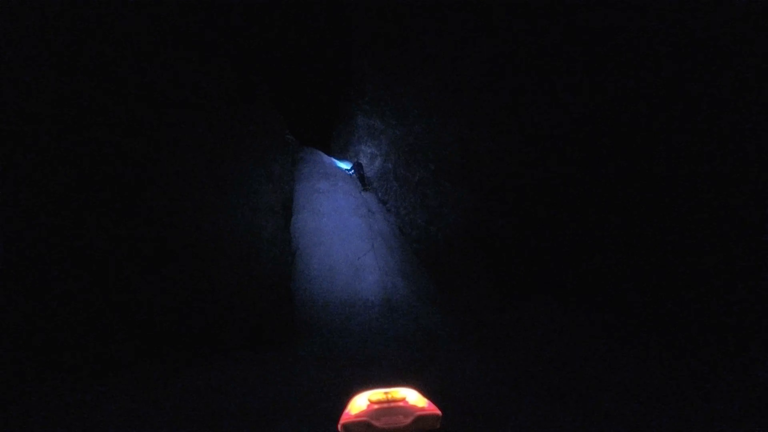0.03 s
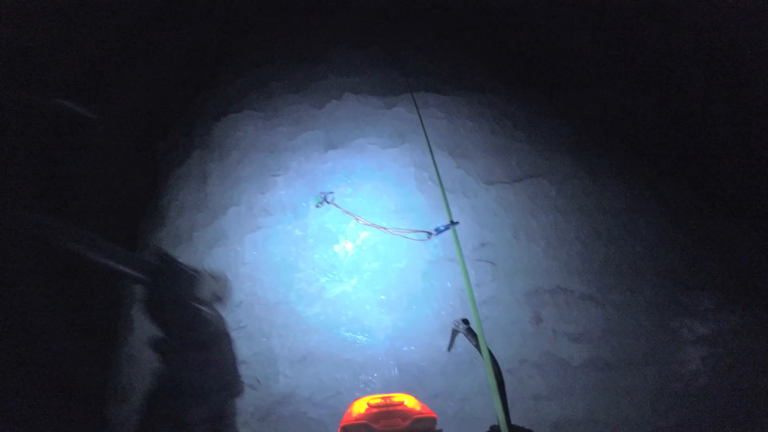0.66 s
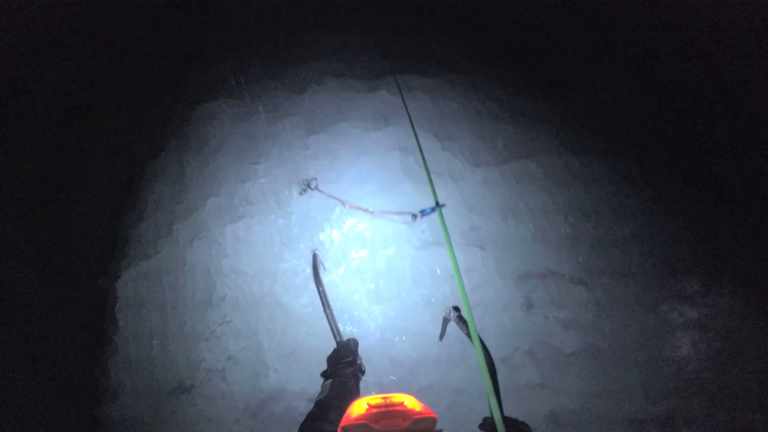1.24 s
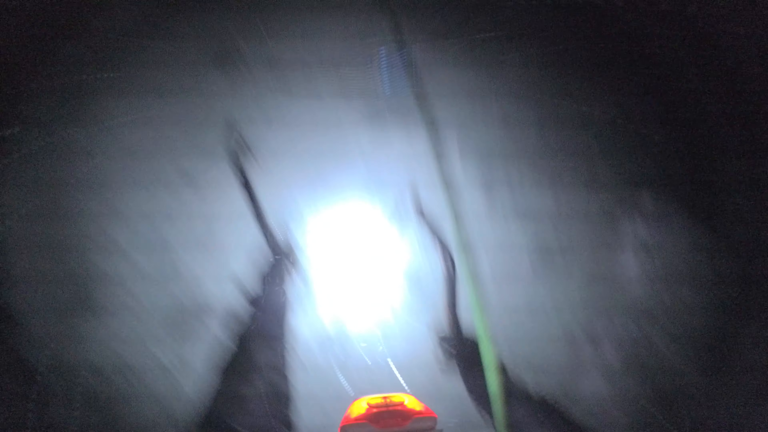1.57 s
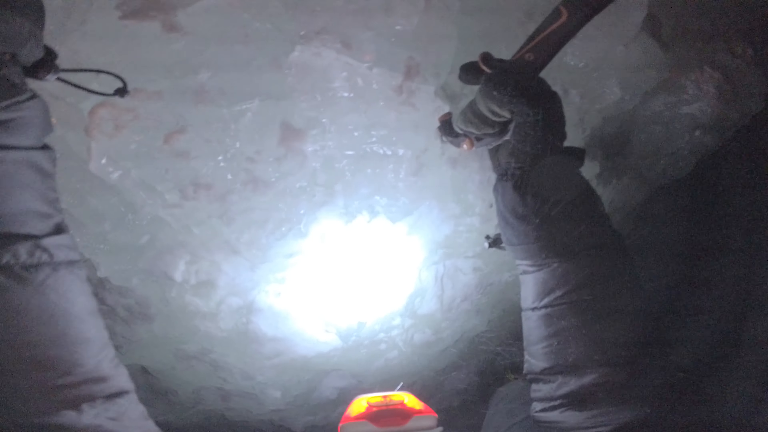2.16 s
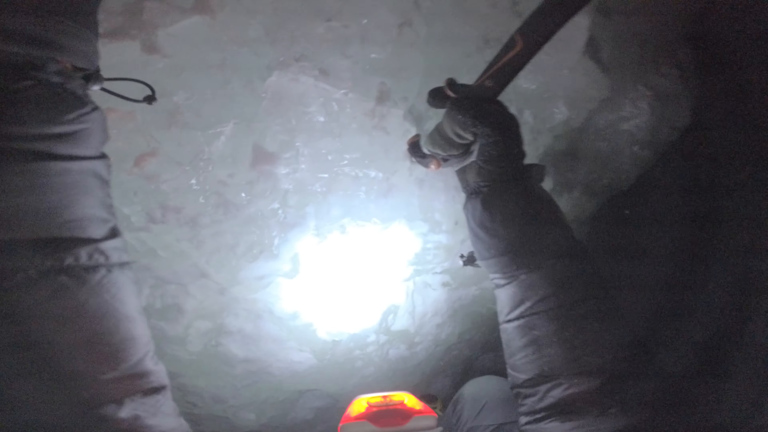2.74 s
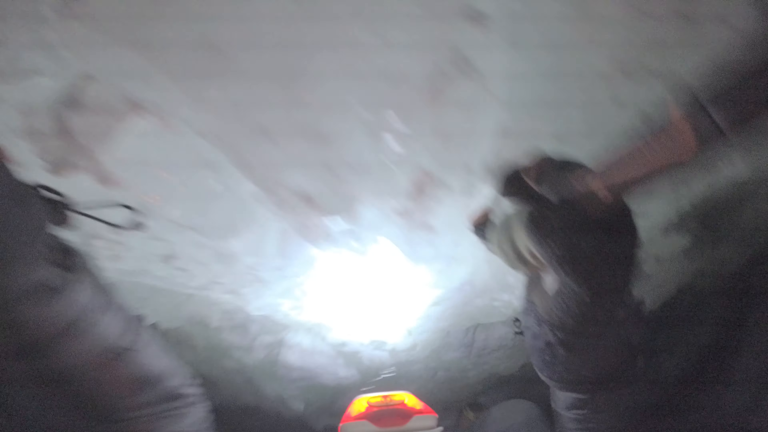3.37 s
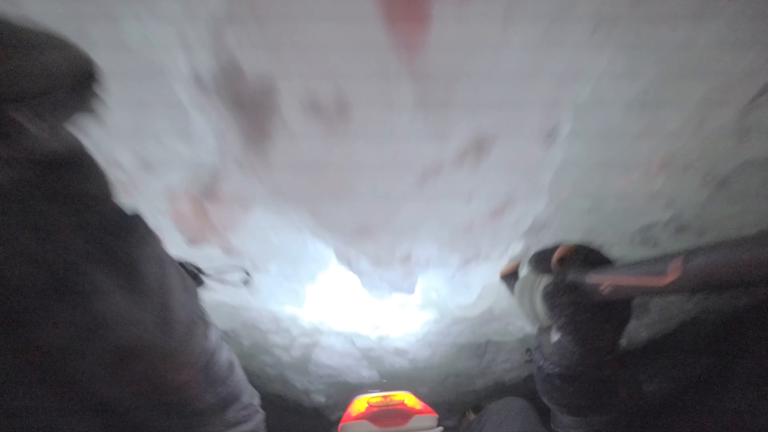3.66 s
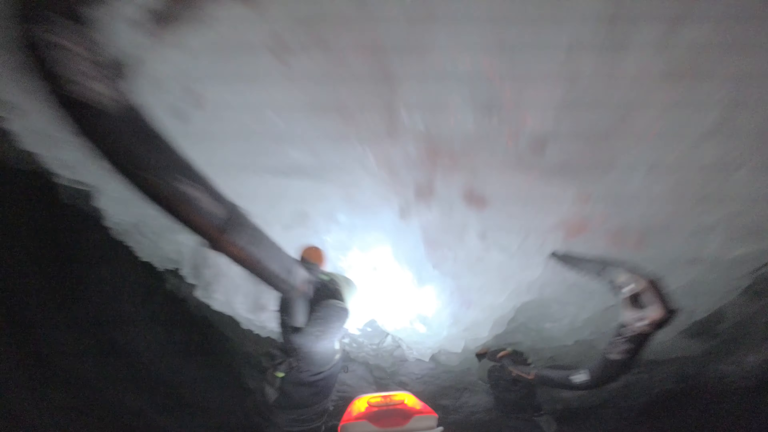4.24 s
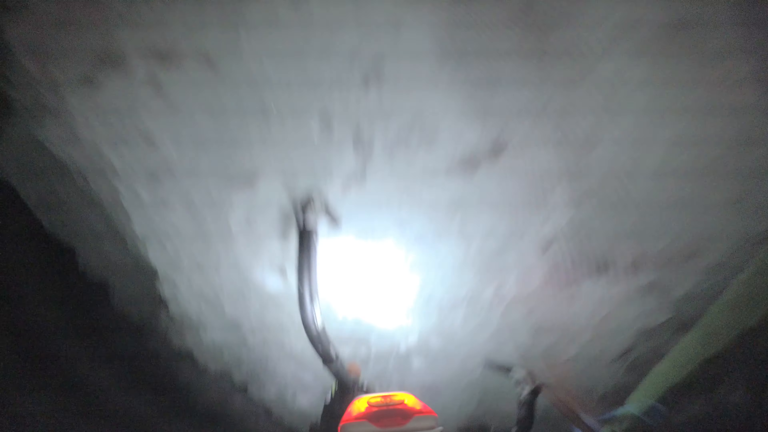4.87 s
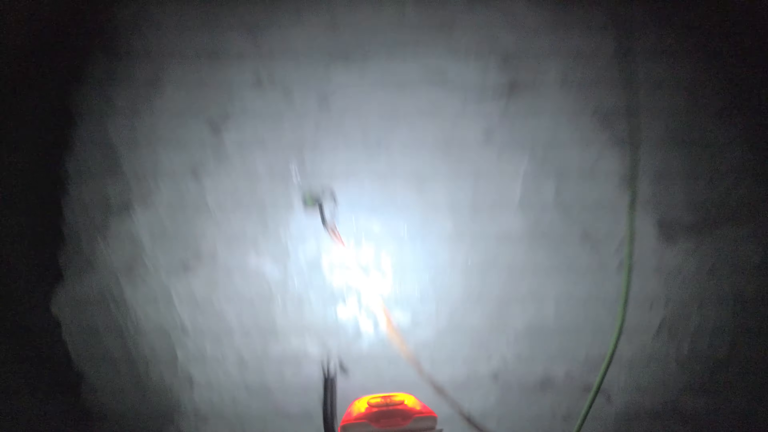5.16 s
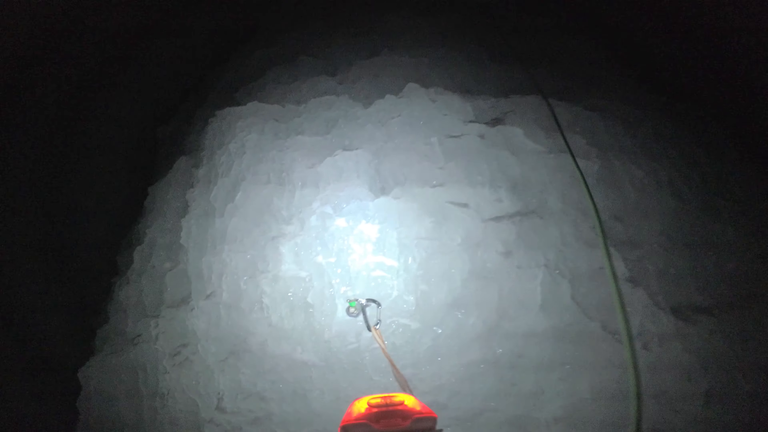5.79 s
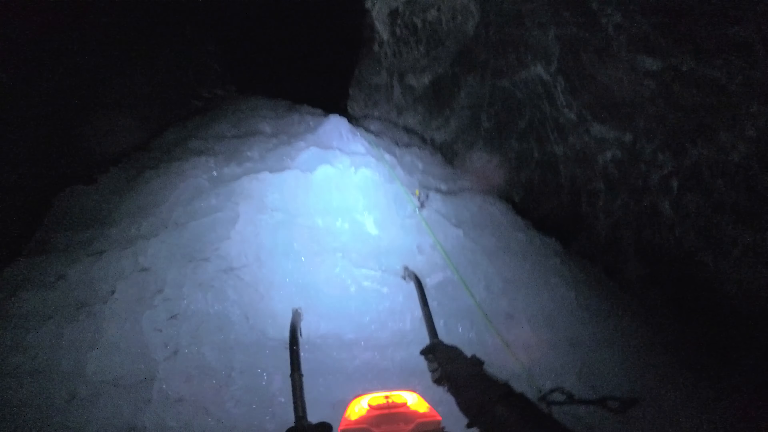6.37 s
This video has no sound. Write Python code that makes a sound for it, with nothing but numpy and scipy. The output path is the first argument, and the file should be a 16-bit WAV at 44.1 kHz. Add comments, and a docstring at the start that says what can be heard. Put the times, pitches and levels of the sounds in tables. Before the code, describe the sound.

A low rush of air and soft clothing rustle run throughout, heard close up from a body-worn microphone on an ice wall. At about 1 second an ice axe cracks sharply into the ice, its pick ringing briefly and spraying chips; loose bits patter down for the next second. Dry tool taps follow, the clearest near 2.3 seconds. Crampons crunch into the ice at about 2.7, 3.6 and 4.7 seconds, with more taps, small scrapes and swells of rustling and low rumble between them. At 4.8 seconds a bump on the microphone mount makes a loud, short, hollow boom. Steel harness gear clinks lightly from about 4.5 to 5.8 seconds. After two small ticks, a second axe blow bites in at 6.2 seconds with a knock, a short steel ring and a hiss of fine ice.

```python
"""An ice axe bites twice into a frozen fall at night: the pick cracks in, sings and sprays chips.
Between the blows crampons crunch, tools tap and loose bits patter down. Steel gear clinks on the
climber's harness over rustling clothes and a low rush of air. It is all heard close up through a
body-worn camera, whose mount booms when bumped and whose plastic case rings."""
import sys
import numpy as np
from scipy import signal
from scipy.io import wavfile
from scipy.ndimage import uniform_filter1d

SR = 44100
rng = np.random.default_rng(int(sys.argv[2]) if len(sys.argv) > 2 else 0)


def store_pcm(level_fs):
    """Save levels as 16-bit WAV."""
    pcm = np.round(np.clip(level_fs, -1, 1) * 32767).astype(np.int16)
    wavfile.write(sys.argv[1], SR, np.atleast_2d(pcm).T)


N = 291942
TIME = np.arange(N) / SR
AGE = TIME[:SR // 2]  # time since an event began

# Levels are set ahead of each layer's own trim.
# reaches, pulls and steps: peak t/s, rise/s, fall/s, soft rub/dB, stiff rustle/dB, sway/dB
BODY_MOVES = [(0.58, 0.022, 1, -53, -66.5, -55.5), (1.82, 0.18, 0.2, -53, -54, -49),
              (2.55, 0.27, 1, -53.5, -60.5, -56.5), (3.35, 0.16, 0.42, -49, -52.5, -47.5),
              (4.13, 0.16, 0.66, -52.5, -53, -53), (4.831, 0.12, 0.15, -55.5, -51, -40),
              (5.35, 0.27, 0.75, -58.5, -62.5, -57.5), (5.932, 0.024, 1, -51, -55.5, -54.5),
              (6.6, 0.045, 0.076, -52.5, -66, -54)]
AIR_EQ = [(30, -4), (100, -4), (300, -1.5), (600, -4.5), (1000, -10.5), (1500, -14), (2500, -26),
          (5000, -41), (15000, -50)]  # rushing air and soft cloth: f/Hz, level/dB
BUFFET_EQ = [(10, -22), (22, -4), (35, 0), (62, 0), (90, -8), (200, -20), (1000, -60)]  # low rumble of the case: f/Hz, level/dB
# taps of picks, points and ice lumps: t/s, level/dB, t60/s, tilt/(dB/octave), note f/Hz
TOOL_TAPS = [(0.096, -55.5, .08, 4.5, 2050), (0.347, -48.5, 0.039, 6, 3240), (1.191, -37.5, 0.065, -2, 825),
             (1.505, -45, 0.017, 5.5, 2800), (1.513, -32, 0.014, 3.5, 2870), (1.551, -44.5, 0.032, 2, 3660),
             (1.589, -46, 0.019, 3.5, 2960), (1.643, -43, 0.03, 2, 830), (1.651, -37, 0.049, 2.5, 2400),
             (2.333, -25, 0.038, 1, 420), (2.3499, -22.5, 0.022, 4, 3955), (2.445, -39, 0.074, 2, 2830),
             (2.623, -36, 0.03, 2.5, 570), (2.97, -41, 0.051, 1, 830), (3.203, -36, 0.023, -7, 1860),
             (3.222, -32.5, 0.049, 1.5, 600), (3.288, -35.5, 0.081, 3, 3900), (3.324, -31, 0.021, 2.5, 450),
             (3.372, -35.5, 0.035, 2, 2250), (3.409, -27.5, 0.03, 0, 980), (3.714, -38, 0.059, 4, 2740),
             (3.945, -30, 0.026, 1.5, 1420), (3.989, -35.5, 0.032, -3, 484),
             (4.032, -26.5, 0.024, 1.5, 1460), (4.048, -30.5, 0.091, 0.5, 1460),
             (4.136, -37, 0.018, 2.5, 1610), (4.186, -36.5, 0.088, 2, 1470), (4.545, -40, 0.044, 1.5, 1100),
             (4.703, -28.5, 0.024, -5, 480), (5.066, -38.5, 0.029, 4, 1490),
             (6.075, -33.5, 0.012, 1.5, 1130), (6.105, -39, 0.012, 2, 920)]
TAP_EQ = [(40, -17.5), (180, 12), (400, 8.5), (800, -0.5), (1500, -7.5), (2600, -14), (4500, -19.5),
          (7000, -26.5), (10000, -34.5), (15000, -45)]  # a dry contact: f/Hz, level/dB
ICE_MODES = [(1, 0, 0.017), (1.19, -2, 0.0078)]  # a tapped piece of ice: pitch ratio, level/dB, t60/s
BIT_NOTES = [800, 1560, 2691, 3300]  # falling bits of ice, large to small: f/Hz
# harness clinks: t/s, level/dB, ring length factor, favoured f/Hz, small clip's ping/dB
HARNESS_CLINKS = [(0.587, -61, 0.1, 7000, 16.5), (2.608, -70, 0.16, 7000, 14),
                  (4.559, -50.5, 0.82, 4270, -6), (4.961, -47, 1.3, 5900, -16),
                  (5.04, -50.5, 1.26, 7800, -22), (5.265, -58.5, 1.3, 9300, -38.5),
                  (5.496, -62.5, 1, 8400, -20), (5.821, -52.5, 0.77, 4070, -22),
                  (6.32, -60, 0.13, 7840, 21)]
STEEL_MODES = [(2700, -1, .05), (3050, 0, .06), (3800, -10, .08), (4985, -1, .11), (5469, -8, .11),
               (6845, -3, .06), (9190, -1, .08), (10300, -14, .05), (13100, -12, .07), (13920, -9, .06)]  # steel gear: f/Hz, level/dB, t60/s
# axe blows: t/s, level/dB, bite/s, gap between jerks/s, low push/dB, low and high ice note f/Hz,
# knock/dB, pick's singing/dB, recoil/dB, falling bits/dB
AXE_BLOWS = [(1.0362, -13, 0.0079, 0.0045, -11, 1290, 1694, -10, -7.5, -45.5, -50),
             (6.1963, -15, 0.0076, 0.00313, -38, 720, 1055, -6.5, -8.5, -38.5, -68.5)]
CRACK_EQ = [(40, -4), (150, 2), (500, 4), (1500, 0), (2500, -5.5), (4000, -11.5), (7000, -11.5),
            (10000, -16.5), (15000, -20)]  # ice splitting: f/Hz, level/dB
JERK_EQ = [(60, -13), (350, -6), (520, -10.5), (750, 2), (1200, 1.5), (2000, 2.5), (5000, -26),
           (15000, -34.5)]  # the pick jerking deeper: f/Hz, level/dB
PICK_PEAKS = [(3620, 260, 4), (2700, 350, 6), (3300, 400, 9), (6300, 400, 5), (7150, 350, 7),
              (10800, 700, 3)]  # the steel pick, damped by the ice: f/Hz, width/Hz, lift/dB
# sprays and scrapes: peak t/s, level/dB, rise/s, fall/s, tilt/(dB/octave), rasp f/Hz, rasp/dB
CHIP_SPRAYS = [(1.061, -60, 0.014, 0.018, 3.5, 7200, 20), (1.149, -44.5, 0.044, 0.053, 2, 7400, 4),
               (1.88, -54.5, .11, 0.29, 1, 1500, -5), (2.365, -49, .006, 0.053, -1, 2390, -15.5),
               (2.43, -39, 0.0096, 0.0081, -1, 1500, -18), (3.381, -48, 0.011, 0.017, -1.8, 2400, 22.5),
               (4.49, -54.5, 0.037, 0.031, 3, 1900, 14.5), (5.353, -59, 0.01, 0.019, 3.5, 3420, 5),
               (5.922, -54.5, 0.013, 0.0042, 0, 2017, 14.5), (6.21, -36.5, 0.0039, 0.025, 2, 1010, -2),
               (6.28, -45, 0.053, 0.05, 0.9, 6500, 12.5)]
CHIP_EQ = [(50, -18), (300, 4), (800, 1.5), (1500, -3), (2500, -12.5), (4000, -12.5), (5400, -24.5),
           (7500, -20.5), (10000, -29), (15000, -39)]  # fine ice grains: f/Hz, level/dB
# crampon kicks: t/s, level/dB, hold/s, t60/s, tilt/(dB/octave), ice ring f/Hz, ring/dB
CRAMPON_KICKS = [(2.738, -33, 0.021, 0.1, 2.5, 1760, 13.5), (2.749, -26, 0.0092, 0.19, -0.55, 1460, 9.5),
                 (2.847, -44, 0.0063, 0.15, -0.5, 1580, 19), (3.619, -22.5, 0.0042, 0.1, -0.93, 1440, 15.5),
                 (3.647, -26, 0.005, 0.24, -0.77, 1430, 14.5), (3.731, -31.5, 0.0037, 0.12, -1.5, 1450, 15),
                 (3.788, -40, 0.033, 0.053, 0.5, 1380, -3), (4.667, -27, 0.025, 0.045, 1, 540, 9.5),
                 (4.686, -25.5, 0.012, 0.22, -1.44, 890, 10)]
CRUNCH_EQ = [(30, -2.5), (90, -0.5), (190, 7), (450, -1.5), (1000, -6.5), (1700, -12.5), (2600, -17),
             (4500, -21.5), (7000, -29), (10000, -32), (15000, -50)]  # ice being crushed: f/Hz, level/dB
CAMERA_BUMPS = [(4.773, -1, .0006, 3), (4.801, -5, .009, -30), (4.833, -21, .001, -14)]  # knocks on the camera: t/s, level/dB, contact/s, slap/dB
MOUNT_MODES = [(61, -8.5, .11), (78, -20, .1), (131, -19, .12), (190, -28, .15), (248, -21, .09),
               (345, -7.5, .04), (371, -18, .16)]  # the camera's mount: f/Hz, level/dB, t60/s
SLAP_EQ = [(50, 10), (300, 14), (500, 0.5), (800, 6.5), (1100, -20.5), (1600, 0.5), (2100, -26),
           (3500, -13.5), (7000, -64.5), (15000, -45.5)]  # a slap on the case: f/Hz, level/dB
CASE_PEAKS = [(3756, 260, 19.5), (6566, 660, 12.5), (10900, 960, -3)]  # the plastic case: f/Hz, width/Hz, lift/dB

STILL_AIR_DB, STILL_RUSTLE_DB, STILL_BUFFET_DB = -61.5, -67, -64.5  # the bed while the climber hangs still
RECOIL_DELAY_S, SHOWER_DELAY_S = 0.063, 0.56  # from a blow to the peak of each
LOOSENED_DB = -7.5  # bits rubbed off by a move, against its rustle
FAVOUR_DB = 6.5  # lift of the modes that a clink favours
SING_WAVER = 0.0096  # share of its pitch by which the ice's shifting grip bends the pick's note
TOP_HZ = 15200


def amp(db):
    """Decibels to gain."""
    return 10 ** (np.asarray(db) / 20)


def unit_rms(x):
    """Scales to rms 1."""
    return x / np.sqrt(np.mean(x ** 2) + 1e-20)


def add(mix, s, sound):
    """Mixes a sound in at time s."""
    part = mix[max(round(s * SR), 0):][:len(sound)]
    part += sound[:len(part)]


def causal(x, gain_at, size=4096):
    """Minimum-phase filter whose gain is a function of frequency."""
    log_gain = np.log(gain_at(abs(np.fft.fftfreq(size, 1 / SR)) + 1) + 1e-6)
    impulse = np.fft.ifft(np.exp(np.conj(signal.hilbert(log_gain)))).real
    return signal.oaconvolve(x, impulse[:size // 2])[:len(x)]


def colour(x, eq, tilt_db=0):
    """Applies an EQ curve, tilted per octave above the bass, and keeps the sound's energy."""
    f, db = np.transpose(eq)

    def gain_at(hz):
        tilt = tilt_db * np.log2(np.clip(hz, 200, 9000))
        return amp(np.interp(np.log(hz), np.log(f), db) + tilt)
    return unit_rms(causal(x, gain_at)) * np.sqrt(np.mean(x ** 2))


def resonances(x, peaks):
    """Lifts a sound around each peak: f/Hz, width/Hz, lift/dB."""
    def gain_at(hz):
        power = sum(amp(db) ** 2 / (1 + (2 * (hz - f) / width) ** 2) for f, width, db in peaks)
        return np.sqrt(1 + power / 2)
    return causal(x, gain_at)


def ring(modes, length=1):
    """Dying sines of a struck object."""
    return sum(amp(db - 60 * AGE / (t60 * length)) * np.sin(2 * np.pi * hz * AGE)
               for hz, db, t60 in modes)


def grains(shape, per_s, spread_db, hiss):
    """Tiny fractures of uneven size over a fine hiss, under an envelope whose energy they take."""
    n = len(shape)
    clicks = (rng.random(n) < per_s / SR) * rng.choice([-1, 1], n)
    sizes = amp(spread_db * np.minimum(rng.exponential(1, n), 4))
    texture = unit_rms(clicks * sizes) + hiss * rng.standard_normal(n)
    return unit_rms(shape * texture) * np.sqrt(np.mean(shape ** 2))


def burst(rise, hold, t60):
    """Envelope that rises, holds and dies away."""
    return np.minimum(AGE / rise, 1) * amp(-60 * np.maximum(AGE - hold, 0) / t60)


def wobble(seconds):
    """Smooth random drift of rms 1."""
    size = max(int(seconds * SR), 1)
    return unit_rms(uniform_filter1d(uniform_filter1d(rng.standard_normal(N), size), size))


def surge(s, db, rise, fall):
    """Power envelope that swells up to time s and then dies away."""
    t = TIME - s
    return amp(db) ** 2 * np.exp(np.where(t < 0, -(t / rise) ** 2, -2 * t / fall))


def movement():
    """Power envelopes of the climber's rub, rustle and sway."""
    shapes = np.array([surge(s, 0, rise, fall) for s, rise, fall, *_ in BODY_MOVES])
    powers = amp([levels for _, _, _, *levels in BODY_MOVES]) ** 2
    return powers.T @ shapes


def air(rub):
    """A dark bed of rushing air that swells as soft cloth rubs."""
    level = np.sqrt(amp(STILL_AIR_DB) ** 2 + rub)
    return level * amp(-1.5) * colour(rng.standard_normal(N), AIR_EQ)


def buffeting(sway):
    """The case rumbles as the body sways, and as it rocks just after a blow."""
    recoil = sum(surge(s + RECOIL_DELAY_S, db, rise=0.031, fall=0.09) for s, *_, db, _ in AXE_BLOWS)
    level = np.sqrt(amp(STILL_BUFFET_DB) ** 2 + sway + recoil)
    return level * colour(rng.standard_normal(N), BUFFET_EQ)


def clothes(rustle):
    """Stiff clothes crackle and shed frost with every move."""
    crackle = grains(amp(1.5 * wobble(.012)), per_s=350, spread_db=3.5, hiss=2)
    level = np.sqrt(amp(STILL_RUSTLE_DB) ** 2 + rustle)
    return level * amp(-5.5) * colour(crackle, CHIP_EQ, tilt_db=2.5)


def taps():
    """Dry contacts: a tick, a little crumbling and a brief, rough note from the piece that was hit."""
    out = np.zeros(N)
    for s, db, t60, tilt_db, hz in TOOL_TAPS:
        contact = grains(burst(0.0026, 0.00014, t60), per_s=6000, spread_db=1.0, hiss=0.67)
        contact[0] += amp(7.0)  # the tick
        note = ring([(hz * ratio, note_db, note_t60) for ratio, note_db, note_t60 in ICE_MODES])
        add(out, s, amp(db) * (colour(contact, TAP_EQ, tilt_db) + amp(-3.5) * note))
    return out


def wall_scatter(x):
    """Ice and rock walls throw back a short, diffuse tail."""
    tail = rng.standard_normal(len(AGE)) * burst(0.0048, 0.0088, 0.16)
    return signal.oaconvolve(x, tail / np.linalg.norm(tail))[:N]


def patter(rustle):
    """Bits of ice tick on the wall and jacket: a shower after a blow, a few with every move."""
    shower = sum(surge(s + SHOWER_DELAY_S, db, rise=0.22, fall=0.39) for s, *_, db in AXE_BLOWS)
    bits = np.zeros(N)
    for hz in BIT_NOTES:
        ticks = grains(np.ones(N), per_s=24, spread_db=1.5, hiss=0)
        crumble = rng.standard_normal(len(AGE)) * burst(.0008, 0, .02)
        landings = colour(signal.oaconvolve(ticks, crumble)[:N], TAP_EQ, tilt_db=3.5)
        bits += resonances(landings, [(hz, 500, 14)])
    level = np.sqrt(shower + amp(LOOSENED_DB) ** 2 * rustle)
    return level * amp(-3.5) * unit_rms(bits)


def clinks():
    """Steel gear ticks together and chatters once; each contact favours one range of its modes."""
    out = np.zeros(N)
    for s, db, length, favoured_hz, ping_db in HARNESS_CLINKS:
        modes = [(hz, mode_db + FAVOUR_DB * np.exp(-(2 * np.log2(hz / favoured_hz)) ** 2), t60)
                 for hz, mode_db, t60 in STEEL_MODES]
        grit = grains(burst(0.00012, 0.0018, 0.081), per_s=2400, spread_db=2.5, hiss=0.95)
        tick = colour(grit, TAP_EQ, tilt_db=6)
        steel = ring(modes + [(7190, ping_db, 0.38)], length)
        add(out, s, amp(db) * (amp(-13.0) * steel + amp(-1.0) * tick))
        add(out, s + rng.uniform(0.00048, 0.003), amp(db - 4) * steel)  # the chatter
    return out


def axe_blows(jerks=2):
    """The pick cracks into the ice in jerks and sings while it moves; the ice answers with a knock."""
    out = np.zeros(N)
    for s, db, bite, gap, push_db, low_hz, high_hz, knock_db, sing_db, _, _ in AXE_BLOWS:
        biting = burst(0.0006, bite, 0.02)
        fractures = grains(biting, per_s=4800, spread_db=5.0, hiss=1.0)
        crack = resonances(colour(fractures, CRACK_EQ), PICK_PEAKS)
        sing_hz = PICK_PEAKS[0][0] * (1 + SING_WAVER * wobble(0.0022)[:len(AGE)])
        sing = amp(sing_db) * biting * np.sin(2 * np.pi * np.cumsum(sing_hz) / SR)
        shiver = ring([(3790, -29, .12), (7200, -25, .04)])  # the stuck shaft trembles on
        push = 2 * ring([(115, push_db, 0.04)])
        add(out, s, amp(db) * (crack + sing + shiver) + push)
        first_jerk = s + .0038
        knock = ring([(low_hz, knock_db, .025), (high_hz, knock_db, .025)])
        add(out, first_jerk, knock)
        jerk = colour(amp(-4.0) * burst(.00005, 0, 0.00032), JERK_EQ)
        for k in range(jerks):
            add(out, first_jerk + k * gap, jerk)
    return out


def chips():
    """Swells of fine ice grains, thrown out by a blow or scraped off the wall."""
    out = np.zeros(N)
    for s, db, rise, fall, tilt_db, rasp_hz, rasp_db in CHIP_SPRAYS:
        t = TIME[:SR] - 2.5 * rise  # zero at the peak
        swell = np.exp(-(t / np.where(t < 0, rise, fall)) ** 2 / 2)
        spray = colour(grains(swell, per_s=1800, spread_db=4.0, hiss=1.0), CHIP_EQ, tilt_db)
        add(out, s + t[0], amp(db) * resonances(spray, [(rasp_hz, 800, rasp_db)]))
    return out


def crampon_kicks():
    """Front points crack the crust and crush the ice: a fading run of fractures with a hollow ring."""
    out = np.zeros(N)
    for s, db, hold, t60, tilt_db, ring_hz, ring_db in CRAMPON_KICKS:
        crush = grains(burst(.0014, hold, t60), per_s=1800, spread_db=3.3, hiss=.4)
        crush[0] += amp(6.5)  # the crust snaps
        crunch = colour(crush, CRUNCH_EQ, tilt_db)
        add(out, s, amp(db) * resonances(crunch, [(ring_hz, 320, ring_db)]))
    return out


def bumps():
    """A slap on the camera sets its mount booming; a long, soft contact moves only the lowest modes."""
    out = np.zeros(N)
    for s, db, contact, slap_db in CAMERA_BUMPS:
        force = np.sin(np.pi * np.minimum(AGE / contact, 1))
        boom = signal.oaconvolve(ring(MOUNT_MODES), force / force.sum())[:len(AGE)]
        slap = colour(burst(.00005, 0, 0.00021), SLAP_EQ)
        add(out, s, -amp(db) * (boom + amp(slap_db + 26.5) * slap))
    return out


def scene():
    """The mono mix at the camera: hard contacts get a faint tail, the rest stays dry."""
    rub, rustle, sway = movement()
    contacts = axe_blows() + crampon_kicks() + taps() + clinks() + patter(rustle)
    foreground = contacts + amp(-27.5) * wall_scatter(contacts) + chips() + bumps()
    bed = air(rub) + buffeting(sway) + clothes(rustle)
    return (foreground + bed)[None]


def record(dry):
    """The case rings, the loudest hits soft-clip and a steep low-pass takes off the top."""
    boxy = resonances(dry[0], CASE_PEAKS)
    clipped = boxy / (1 + boxy ** 6) ** (1 / 6)
    lowpass = signal.firwin(255, TOP_HZ, window=("kaiser", 9), fs=SR)
    return signal.oaconvolve(clipped, lowpass, "same")[None]


dry = scene()
out = record(dry)
store_pcm(out)
```